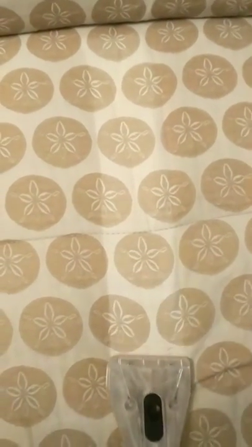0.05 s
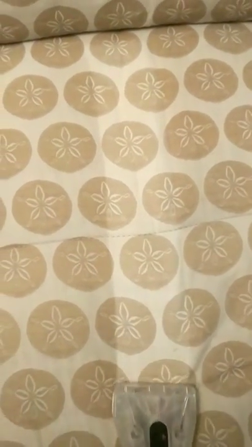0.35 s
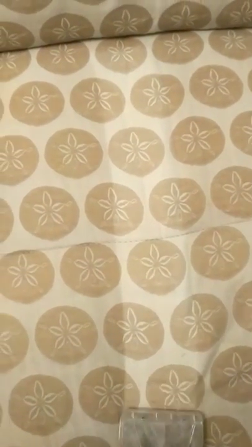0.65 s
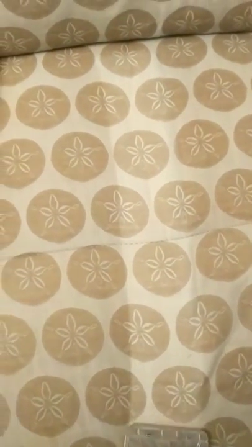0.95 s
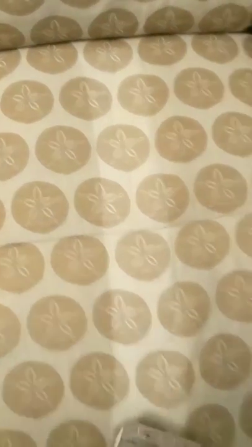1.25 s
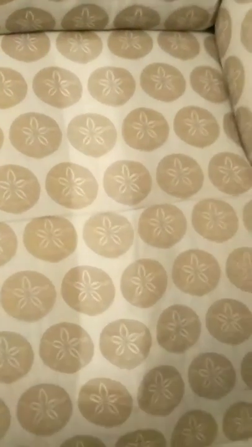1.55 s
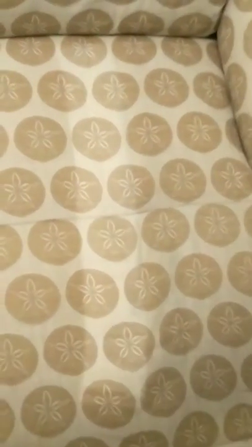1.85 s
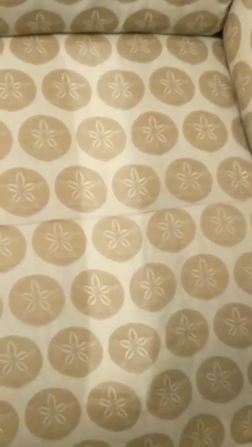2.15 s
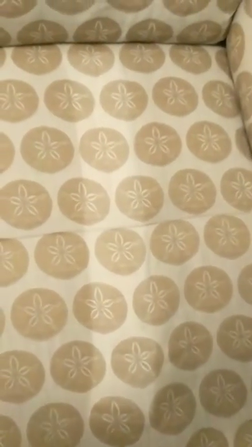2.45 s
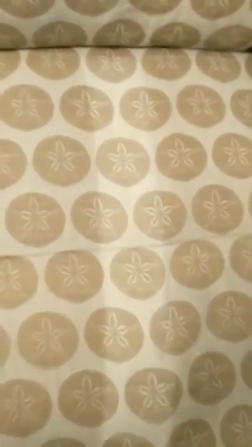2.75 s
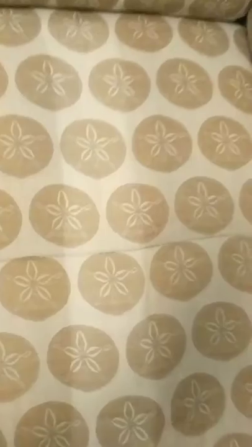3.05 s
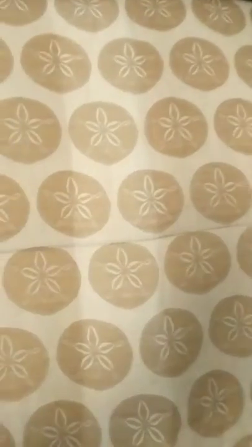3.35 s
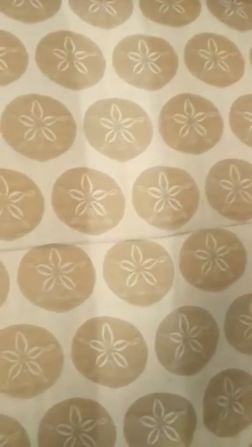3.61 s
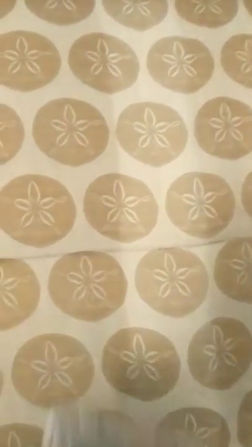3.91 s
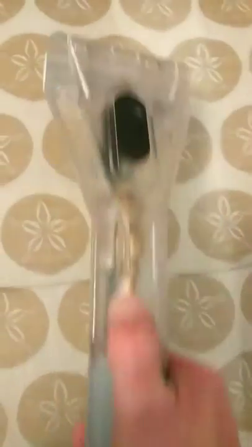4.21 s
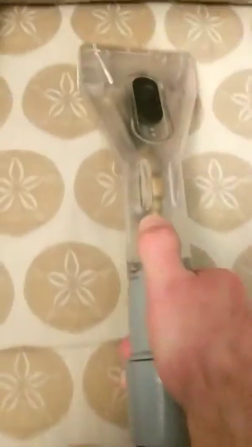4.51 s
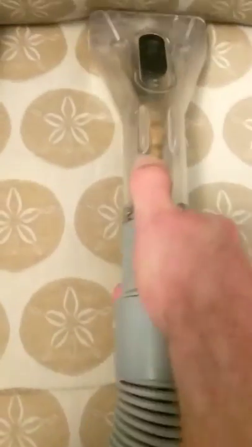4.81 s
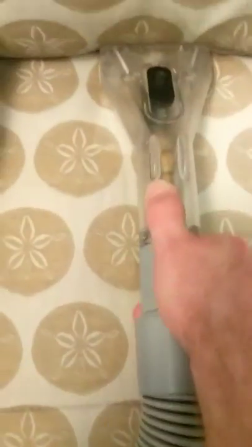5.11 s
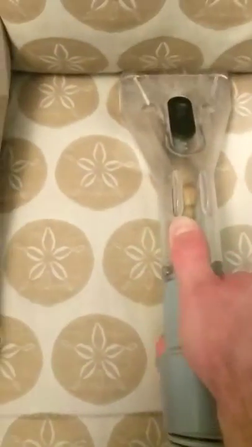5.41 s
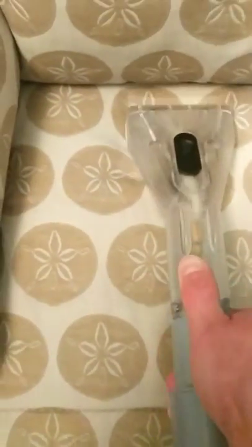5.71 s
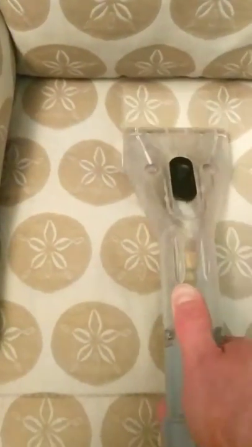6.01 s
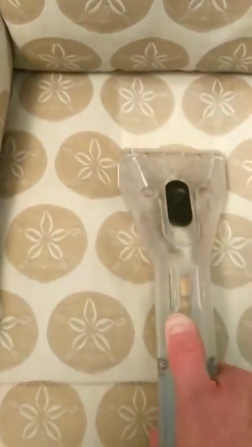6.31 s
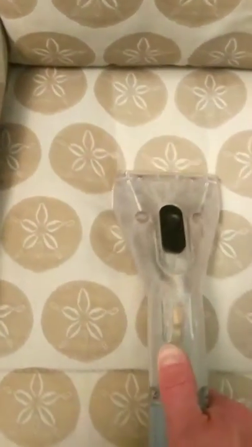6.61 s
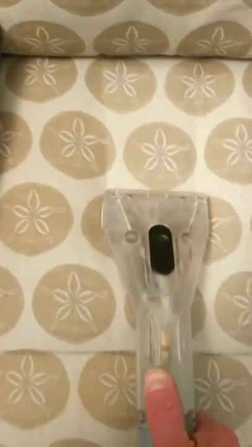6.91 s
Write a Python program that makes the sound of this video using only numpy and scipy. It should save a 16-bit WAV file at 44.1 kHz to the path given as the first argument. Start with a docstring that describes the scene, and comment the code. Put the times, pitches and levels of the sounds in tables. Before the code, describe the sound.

A vacuum upholstery tool hisses wetly over a cushion, lifts into a hollow rush of air, then lands and hisses again.

```python
"""A plastic upholstery tool on a vacuum hose, drawn over an armchair cushion, close up. Pressed down, it hisses
through the weave, whistles at the lip and sucks droplets. Lifted, it gulps free air and its hollow head
resonates. It lands again by the backrest and is pulled back. Behind it: soft bumps of hand, hose and cloth
against the backrest, a distant humming motor, a small furnished room."""
import sys
import numpy as np
from scipy import signal
from scipy.io import wavfile
from scipy.ndimage import uniform_filter1d

SR = 44100
rng = np.random.default_rng(int(sys.argv[2]) if len(sys.argv) > 2 else 0)


def digitize_waveform(pressure):
    """Quantize a signal to 16-bit integers and store it at the path in sys.argv[1].

    Rows of a 2-D input are taken as channels; values are limited to [-1, 1].
    """
    field = np.atleast_2d(pressure).T
    bounded = np.clip(field, -1, 1)
    quanta = np.round(bounded * 32767).astype(np.int16)
    wavfile.write(sys.argv[1], SR, quanta)


N = 311346
TIME_S = np.arange(N) / SR
FRAME_S = np.arange(N // 256 + 5)[:, None] * 256 / SR
BIN_HZ = np.fft.rfftfreq(1024, 1 / SR)

# Two strokes on the cloth. Each row: time in seconds, then weave, lip jet and edge leak levels in dB.
STROKE_IN = [(0, -28.7, -30, -44), (.17, -29.5, -28.4, -45.5), (.3, -27.5, -29.5, -48.5),
             (.97, -30, -29.5, -48.5), (1.03, -28, -26.5, -46.3), (1.27, -29, -26.6, -46.5)]
STROKE_BACK = [(4.55, -35.5, -25, -49), (4.82, -35, -23.5, -49.5), (5.27, -37, -25, -52.5),
               (5.36, -30.5, -25.1, -50), (5.55, -31.5, -25.5, -51), (5.74, -30, -28.2, -46),
               (5.91, -31.5, -26, -45.5), (6.08, -30, -21.5, -46), (6.25, -30, -24.5, -46),
               (6.55, -31, -24.5, -46), (6.93, -30, -27.5, -46.5), (7.06, -27.5, -28.5, -46.7)]
# Backrest echo. Each row: time in seconds, extra path in metres.
BACKREST_PATH = [(0, 0.27), (1.3, 0.32), (4.55, 0.197), (4.85, .174), (5.18, 0.17), (5.3, 0.15),
                 (5.5, 0.159), (5.9, 0.18), (6.5, 0.21), (7.06, 0.23)]
# Lip whistles. Each row: midpoint in seconds, length in seconds, pitch in Hz, lift over the hiss in dB.
LIP_WHISTLES = [(1.003, .3, 11000, 4), (4.68, .22, 12400, 4), (4.92, 0.25, 11600, 4),
                (5.12, 0.29, 14150, 2), (5.1, 0.27, 12950, 2), (5.41, 0.39, 11100, 8), (5.6, .4, 13100, 5),
                (6.024, 0.2, 6600, 7), (6.5, .5, 9800, 6), (6.55, .17, 12350, 4), (6.55, .9, 3170, 4.5)]
# Mouth over the cushion. Each row: time in seconds, height in metres.
MOUTH_HEIGHT = [(1.3, 0.0064), (1.35, 0.014), (1.41, 0.08), (1.8, .1), (4.06, .1), (4.19, 0.086),
                (4.31, 0.057), (4.44, .017), (4.5, .006)]
# Mouth aim. Each row: time in seconds, facing from 0 (aside) to 1 (at the listener).
MOUTH_FACING = [(1.3, 0.35), (1.9, 0.18), (2.9, 0.81), (3.5, 0.95), (4.12, 0.59), (4.5, 0.6)]
# Air modes of the head. Each row: centre in Hz, width in Hz, lift aside in dB, lift facing in dB.
HEAD_MODES = [(1340, 54, 6, -4), (1440, 120, -4.5, 5.5), (1836, 240, 7, 3), (2050, 190, -1, 4),
              (2680, 530, -7, 10), (2970, 280, 8, 1.5), (4300, 230, 1.5, 2), (5150, 126, 5.5, 5),
              (6425, 220, 4.5, 7.5), (7600, 900, 3, 4.5), (8940, 270, -2, 4.5)]
# Noise spectra. Each row: frequency in Hz, relative level in dB.
WEAVE_SPECTRUM = [(400, -32.5), (1200, -18.5), (1750, -5), (2100, -2.5), (2800, 0.5), (3700, -0.5),
                  (4600, 0), (5700, -1), (8000, -2), (9500, -8.5), (16000, -7)]
LEAK_SPECTRUM = [(60, -24), (250, -15), (500, -2), (800, 0), (1050, 5.5), (1300, 4.5), (1600, 7),
                 (2500, -10.5), (5000, -27)]
RUSH_SPECTRUM = [(25, -40), (60, -24), (110, -20.5), (200, -19), (500, -10.5), (1000, -7.5), (1600, -3),
                 (2100, -1), (3500, -1.5), (5000, -2), (5700, -8), (9000, -7.5), (16000, -13.5)]
LIP_SPECTRUM = [(1500, -28.5), (4000, -3), (7000, -3.5), (9500, -2.5), (10700, 1.5), (12500, 2.5),
                (13500, -0.5), (16000, -0.5)]
MOTOR_SPECTRUM = [(20, -30), (40, -19), (58, -6), (80, 3.5), (130, -5), (170, -2), (260, -2.5), (400, -3),
                  (1000, -26), (4000, -83)]
# Slurps in the slot. Each row: start in seconds, gain in dB, centre in Hz, width in Hz, decay in seconds.
SLURPS = [(0.105, -30, 3600, 1000, .009), (0.677, -32, 2500, 900, .012), (1.0, -35.5, 3440, 2000, .03),
          (1.03, -32, 4860, 2000, .05), (1.13, -31, 4700, 1500, 0.061), (3.81, -35, 2720, 1200, 0.029),
          (4.44, -30, 1740, 220, 0.04), (4.46, -32, 5050, 300, 0.1), (4.505, -17, 5400, 1500, 0.0094),
          (5.598, -36.5, 3450, 1700, .06), (6.02, -26, 2870, 1400, .014)]
# Soft bumps of hand and hose, and of the cloth pushing against the backrest. Each row: start in seconds, gain
# in dB, final pitch in Hz, time scale in seconds.
SOFT_BUMPS = [(1.185, -41, 170, 0.015), (1.354, -36, 68.6, 0.021), (1.5, -44, 62, .025),
              (2.475, -44, 50.5, .015), (2.789, -26.5, 62, 0.009), (3.274, -36, 50, 0.012),
              (3.832, -40, 70, .014), (4.502, -34, 52, 0.015), (4.72, -51, 151, 0.034),
              (4.87, -45, 118, 0.033), (6.042, -42, 70, 0.015)]
# Motor and hose hums. Each row: pitch in Hz, level with the mouth sealed in dB, level with it open in dB.
MOTOR_HUMS = [(190.4, -69.5, -62.5), (352, -79, -83), (651, -73, -53.5), (814, -75, -56)]

OPEN_S, LIFT_S, LAND_S = 1.271, 1.284, 4.522  # a corner opens, the mouth lifts, it seals again
GULP_DECAY_S = 0.27
CLEAR_M = 0.1  # the head rings freely above this height
SOUND_M_PER_S = 343


def tool_on_cloth(nearest_m=0.14, echo_reach_m=0.045, sag_hz_per_m=5000, spread_hz_per_m=41000):
    """Air squeezes through the weave, sizzles in fine jets at the lip and leaks round the edge."""
    strokes = STROKE_IN + STROKE_BACK
    weave_db, jets_db, leak_db = follow(strokes, TIME_S)
    path_m, = follow(BACKREST_PATH, FRAME_S)
    away_m = path_m - nearest_m
    tone = amp(whistle_lift_db(path_m)) * echo(path_m, 0.29 * np.exp(-away_m / echo_reach_m))
    weave = amp(weave_db) * turbulence(colour(WEAVE_SPECTRUM) * tone, patchy_db=1.85, flutter_db=0.87)
    # A tighter seal passes less weave hiss and narrows the sizzle.
    looseness = amp(0.29 * (follow(strokes, FRAME_S)[0] + 31.5))
    width_hz = (4900 + spread_hz_per_m * away_m) * looseness
    sizzle = bell(12520 - sag_hz_per_m * away_m, width_hz) ** 0.56
    sizzle *= BIN_HZ ** 2 / (BIN_HZ ** 2 + 5000 ** 2)
    jets = amp(jets_db) * turbulence(sizzle * tone, patchy_db=2.25, flutter_db=0.5)
    leak = amp(leak_db) * turbulence(colour(LEAK_SPECTRUM), patchy_db=1.2, flutter_db=0.5)
    return weave + jets + leak + amp(weave_db - 13) * droplets()


def whistle_lift_db(path_m, width_share=0.083):
    """Fuzzy lip whistles swell and fade; pitch is inverse to the backrest echo's path."""
    lift_db = 0
    for middle_s, length_s, hz, db in LIP_WHISTLES:
        pitch_hz = hz * follow(BACKREST_PATH, middle_s)[0] / path_m
        swell = np.exp(-(2 * (FRAME_S - middle_s) / length_s) ** 2)
        lift_db += db * swell * bell(pitch_hz, 150 + width_share * pitch_hz)
    return lift_db


def tool_in_air(recover_s=1.1, approach_s=3.86, dive_s=4.08, pinch_s=4.458, cloth_cutoff_hz=3670):
    """Free air rushes through the head and hisses at the lip; the cushion's echo sweeps with height."""
    height_m, = follow(MOUTH_HEIGHT, FRAME_S)
    facing, = follow(MOUTH_FACING, FRAME_S)
    dip_db = 6 * level_dip(recover_s, TIME_S)
    rush_db = -24.5 - dip_db + step(pinch_s, 0.008)  # the last narrow slit swells the rush
    lip_db = -23 - dip_db - 3.5 * level_dip(GULP_DECAY_S, TIME_S)
    # Tipped at the cushion, the mouth loses treble and the echo grows.
    muffle = amp(-4 * step(dive_s, 0.08, FRAME_S) * bell(6500, 2900))
    bounce = 0.18 + 0.28 * step(approach_s, 0.21, FRAME_S) * height_m / CLEAR_M
    head = head_resonance(height_m, facing) * muffle
    cushion = echo(2 * height_m, bounce / (1 + (BIN_HZ / cloth_cutoff_hz) ** 4))
    aside_bass = amp(5 * (1 - facing) / (1 + (BIN_HZ / 500) ** 2))
    rush_shape = colour(RUSH_SPECTRUM) * head * cushion * air_gap(height_m) * aside_bass
    rush = turbulence(rush_shape, patchy_db=1.0, flutter_db=0.61)
    lip = turbulence(colour(LIP_SPECTRUM) * head, patchy_db=2.04, flutter_db=0.14)
    return amp(rush_db) * rush + amp(lip_db) * lip


def head_resonance(height_m, facing, stiffening=0.59, reach_hz=4000):
    """Gain of the head's air modes; nearby cloth raises the low ones in pitch and damps them."""
    covered = np.clip(1 - height_m / CLEAR_M, 0, 1)
    lift_db = 0
    for hz, width_hz, aside_db, front_db in HEAD_MODES:
        grip = covered / (1 + (hz / reach_hz) ** 8)
        free_db = aside_db + facing * (front_db - aside_db)
        lift_db += (1 - grip ** 2) * free_db * bell(hz * (1 + stiffening * grip), width_hz)
    return amp(lift_db)


def air_gap(height_m, gulp_hz=3400, hollow_hz=220, fall_s=0.032, return_s=3.4):
    """Gain of the gap under the mouth: a plunging, dull gulp on opening, a rising ring on closing."""
    age_s = np.maximum(FRAME_S - OPEN_S, 0)
    opening_hz = hollow_hz + (gulp_hz - hollow_hz) * np.exp(-age_s / fall_s)
    closing_hz = 710 * (CLEAR_M / height_m) ** 0.15
    ring_hz = opening_hz + step(return_s, 0.2, FRAME_S) * (closing_hz - opening_hz)
    ring_db = (2 + 6 * np.exp(-age_s / GULP_DECAY_S)) * bell(ring_hz, 300 + ring_hz)
    treble_loss_db = 13.5 * level_dip(GULP_DECAY_S, FRAME_S) * BIN_HZ ** 4 / (BIN_HZ ** 4 + 3000 ** 4)
    radiation = BIN_HZ / np.hypot(BIN_HZ, 0.25 * ring_hz)
    return amp(ring_db - treble_loss_db) * radiation


def level_dip(recover_s, time_s, start_s=1.313):
    """Dip depth, 0 to 1: the rush drops in level just after the lift, then recovers."""
    return step(start_s, 0.024, time_s) * np.exp(-np.maximum(time_s - start_s, 0) / recover_s)


def droplets(rate_per_s=600, spread_db=0.5, decay_cycles=3.7):
    """Water drops tick against the inside of the plastic head."""
    age_s = np.arange(256) / SR
    pitches_hz = np.geomspace(2800, 10000, num=12)
    out = np.zeros(N)
    for hz in pitches_hz:
        sizes = amp(-spread_db * np.minimum(rng.exponential(1, N), 3))
        hits = rng.random(N) < rate_per_s / len(pitches_hz) / SR
        tick = np.sin(2 * np.pi * hz * age_s) * np.exp(-hz * age_s / decay_cycles)
        out += signal.oaconvolve(sizes * hits, tick)[:N]
    return unit(out)


def slurps(attack_s=0.00081):
    """Water or cloth briefly narrows the slot: a short rasp."""
    out = np.zeros(N)
    for start_s, db, hz, width_hz, decay_s in SLURPS:
        age_s = np.maximum(TIME_S - start_s, 0)
        rasp = turbulence(bell(hz, width_hz), patchy_db=2.5, flutter_db=6.5)
        out += amp(db) * rasp * (1 - np.exp(-age_s / attack_s)) * np.exp(-age_s / decay_s)
    return out


def bumps(sag_s=0.0027):
    """Hand, hose and cloth pressed against the backrest give low, heavily damped pushes that sag in pitch."""
    out = np.zeros(N)
    for start_s, db, hz, scale_s in SOFT_BUMPS:
        age_s = np.maximum(TIME_S - start_s, 0)
        cycles = hz * (age_s + 0.013 * (1 - np.exp(-age_s / sag_s)))
        envelope = age_s / scale_s * np.exp(1 - 1.9 * age_s / scale_s)
        out += amp(db) * envelope * np.sin(2 * np.pi * cycles)
    return out


def motor(opened, waver_share=0.01456, rumble_db=-62):
    """Distant suction motor: rumble and wavering hums; most carry better up an open hose."""
    out = amp(rumble_db) * turbulence(colour(MOTOR_SPECTRUM), patchy_db=-1.0, flutter_db=1.1)
    for hz, sealed_db, open_db in MOTOR_HUMS:
        pitch_hz = hz * (1 + waver_share * drift(N, span=900))
        swell = 1 + 0.81 * drift(N, span=2500)
        hum = swell * np.sin(2 * np.pi * np.cumsum(pitch_hz) / SR)
        out += amp(sealed_db + opened * (open_db - sealed_db)) * unit(hum)
    return out


def room(x, wet_db=-16, t60_s=0.078, echoes_per_s=1500, predelay_s=0.004):
    """Small furnished room: sparse reflections that die quickly."""
    delay_s = np.arange(SR // 3) / SR
    taps = rng.standard_normal(len(delay_s)) * (rng.random(len(delay_s)) < echoes_per_s / SR)
    taps *= (delay_s > predelay_s) * amp(-60 * delay_s / t60_s)
    return x + amp(wet_db) * signal.oaconvolve(x, taps / np.linalg.norm(taps))[:N]


def turbulence(shape, patchy_db, flutter_db):
    """Noise of rms 1 with a moving spectrum; eddies make patches in it and flutter its level."""
    real, imag, eddies = rng.standard_normal((3, len(FRAME_S), len(BIN_HZ)))
    eddies = uniform_filter1d(eddies, size=30, axis=0)
    eddies = unit(uniform_filter1d(eddies, size=7, axis=1))
    flutter = drift(len(FRAME_S), span=6)[:, None]
    shape = shape / np.linalg.norm(shape, axis=-1, keepdims=True)
    spectra = (real + 1j * imag) * shape * amp(patchy_db * eddies + flutter_db * flutter)
    return unit(signal.istft(spectra.T, nperseg=1024, noverlap=768)[1][:N])


def echo(path_m, strength):
    """Comb gain of a sound plus its reflection over an extra path."""
    return abs(1 + strength * np.exp(-2j * np.pi * BIN_HZ * path_m / SOUND_M_PER_S))


def bell(centre_hz, width_hz):
    """Power response of one resonance, 1 at its centre."""
    return 1 / (1 + (2 * (BIN_HZ - centre_hz) / width_hz) ** 2)


def colour(spectrum):
    """Gain per bin of a spectrum table."""
    hz, db = np.transpose(spectrum)
    return amp(np.interp(np.log(BIN_HZ + 1), np.log(hz), db))


def follow(rows, time_s):
    """Each value column of a curve table at the given times."""
    knots_s, *columns = np.transpose(rows)
    return [np.interp(time_s, knots_s, column) for column in columns]


def step(middle_s, ease_s, time_s=TIME_S):
    """Smooth rise from 0 to 1."""
    return 0.5 + 0.5 * np.tanh((time_s - middle_s) / ease_s)


def drift(count, span):
    """Noise of rms 1, averaged over span points."""
    return unit(uniform_filter1d(rng.standard_normal(count), size=span))


def amp(db):
    """Decibels to gain."""
    return 10 ** (np.asarray(db) / 20)


def unit(x):
    """Scales to rms 1."""
    return x / np.sqrt(np.mean(x ** 2) + 1e-20)


def scene():
    """The seal breaks at one corner, lets go, then snaps shut on landing. Mono."""
    landed = step(LAND_S, 0.013)
    sealed = 1 - step(LIFT_S, 0.017) + landed
    opened = step(OPEN_S, 0.014) * (1 - landed)
    tool = sealed * tool_on_cloth() + opened * tool_in_air() + slurps()
    mix = room(tool) + bumps() + motor(opened)
    return np.array([mix, mix])


def record(dry):
    """The small microphone loses bass below 36 Hz; the band ends at 15.8 kHz."""
    thin = signal.sosfilt(signal.butter(2, 36, "high", fs=SR, output="sos"), dry)
    lowpass = signal.firwin(801, 15800, window=("kaiser", 9), fs=SR)
    return signal.oaconvolve(thin, lowpass[None], "same")


dry = scene()
out = record(dry)
digitize_waveform(out)
```